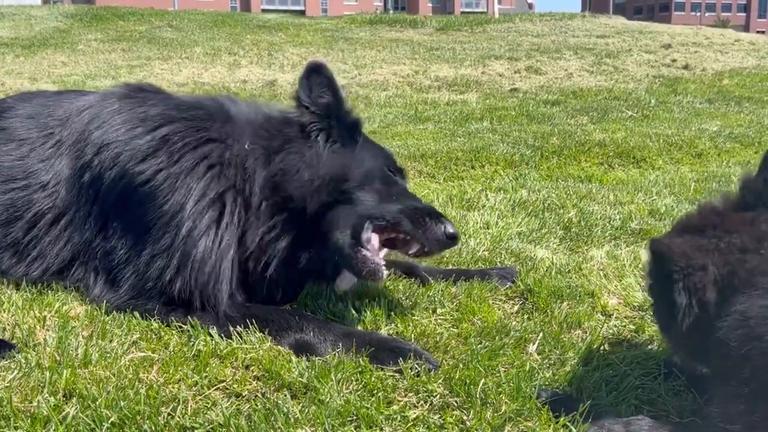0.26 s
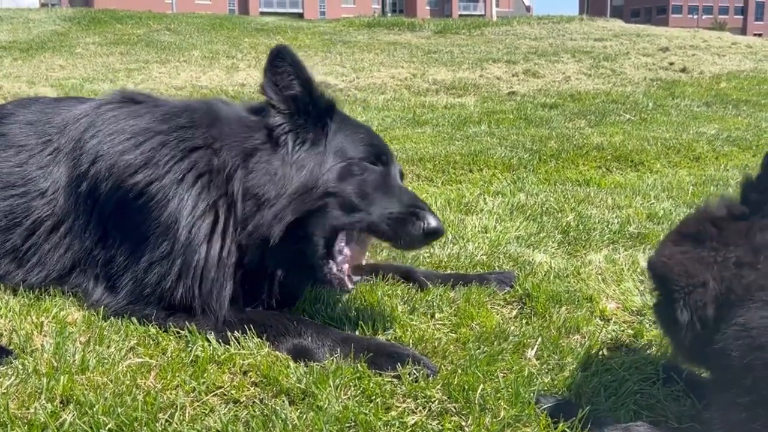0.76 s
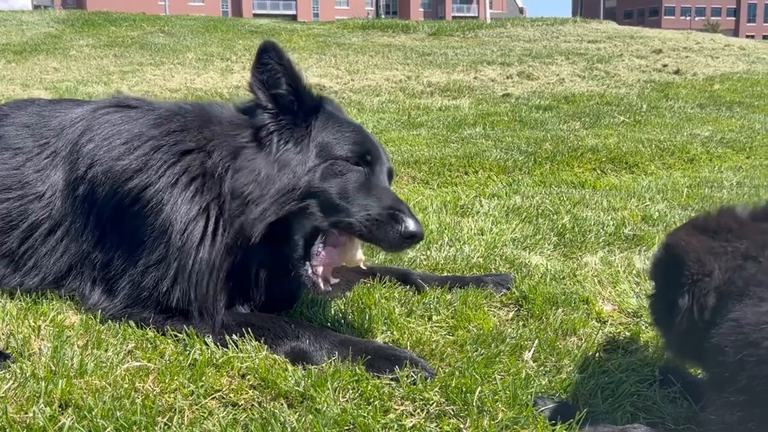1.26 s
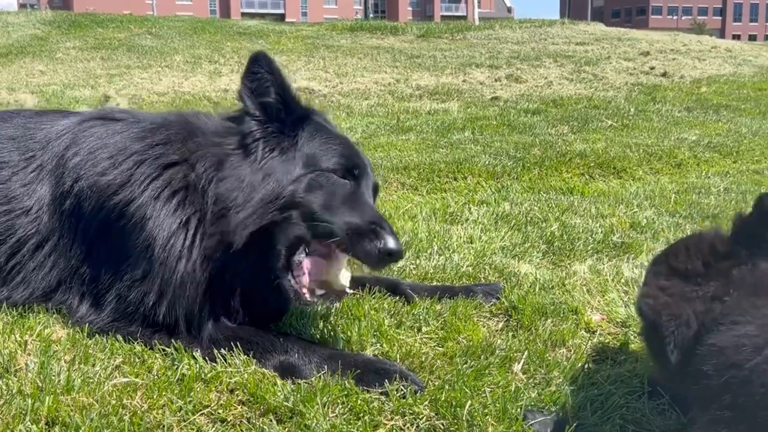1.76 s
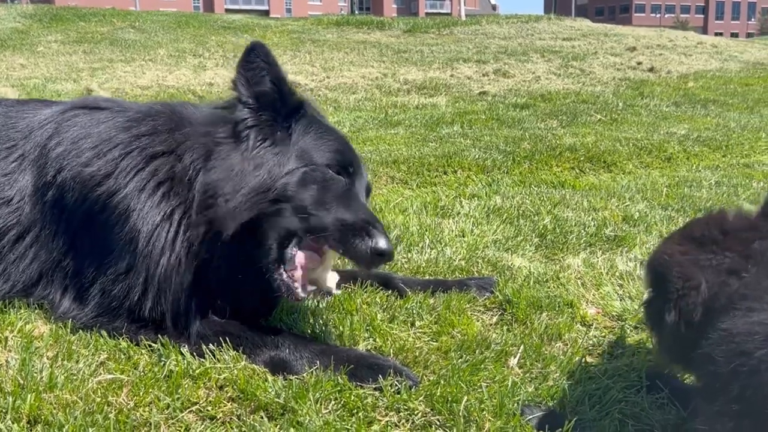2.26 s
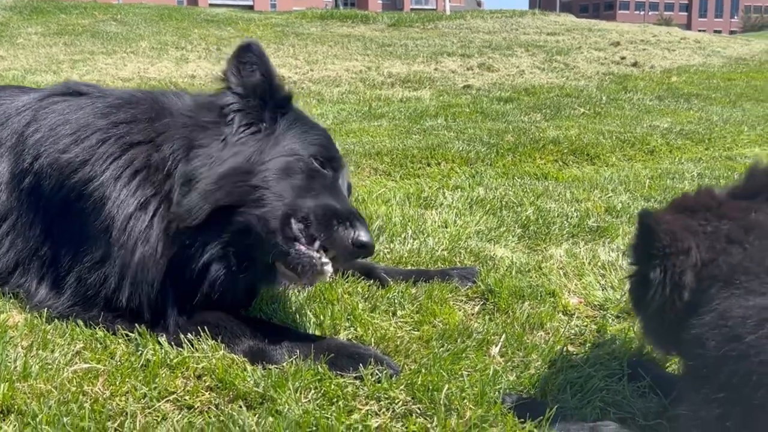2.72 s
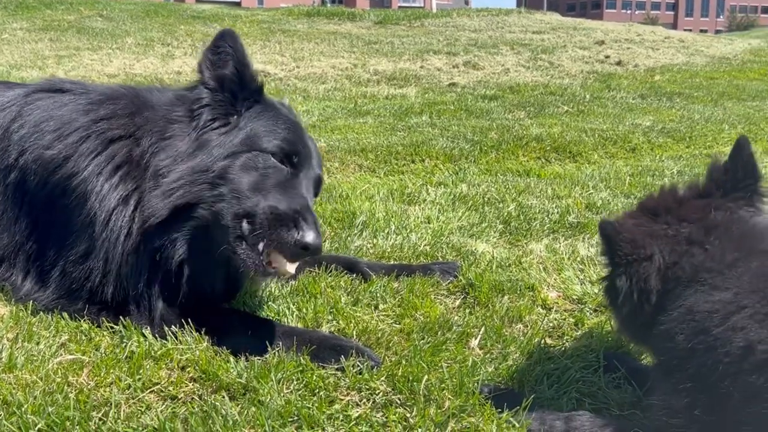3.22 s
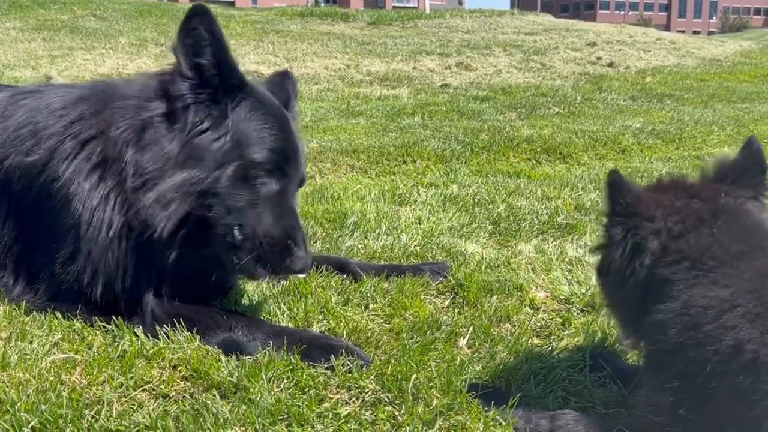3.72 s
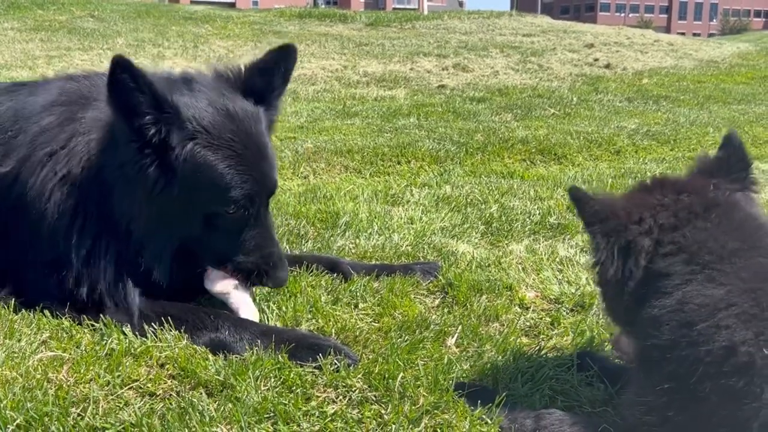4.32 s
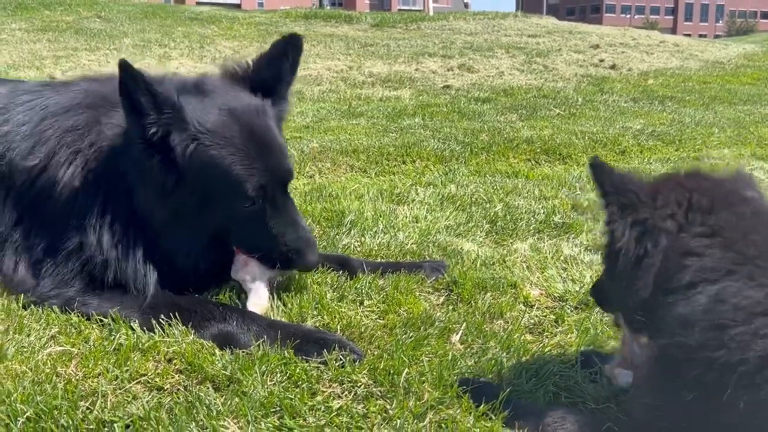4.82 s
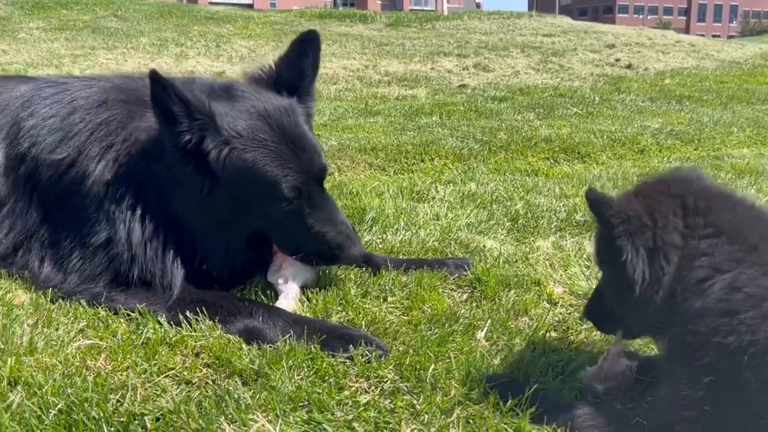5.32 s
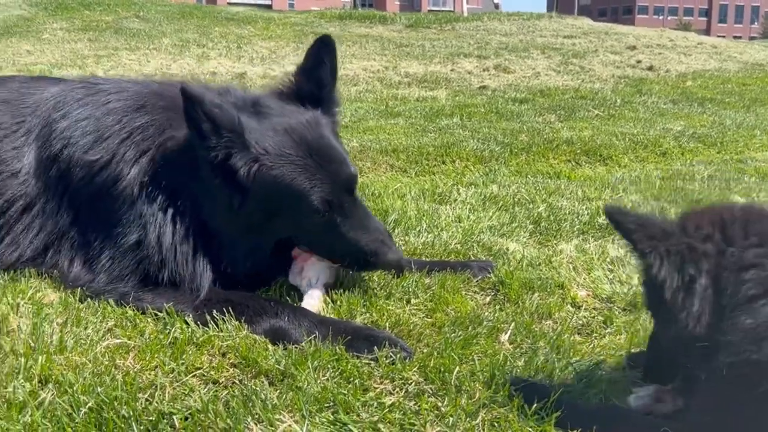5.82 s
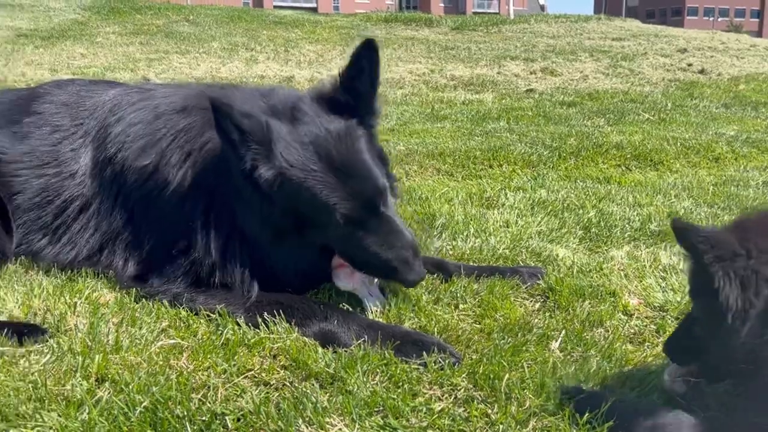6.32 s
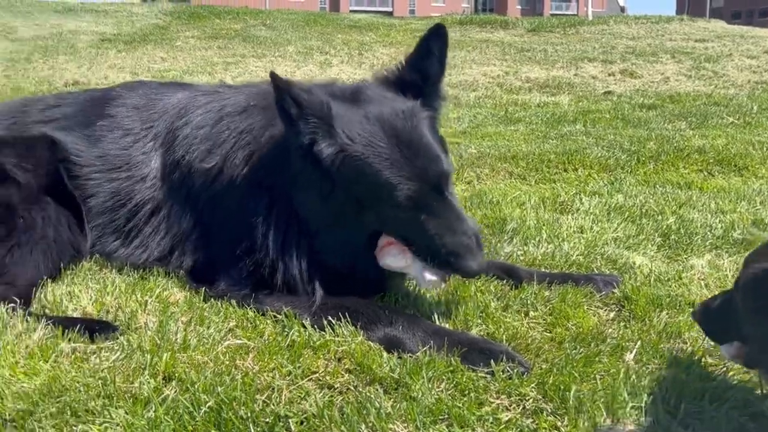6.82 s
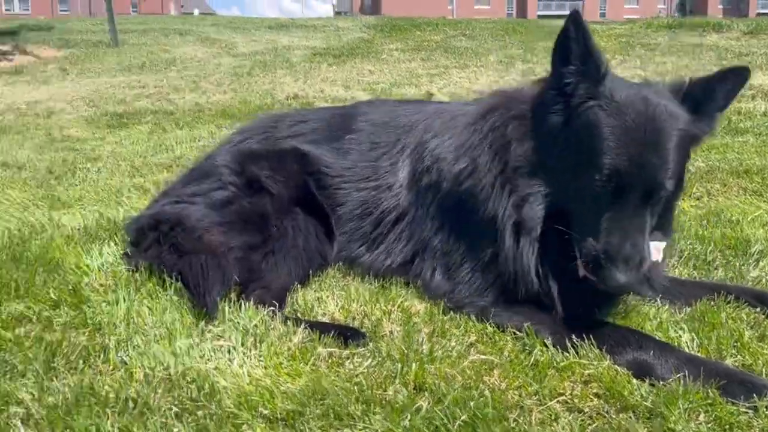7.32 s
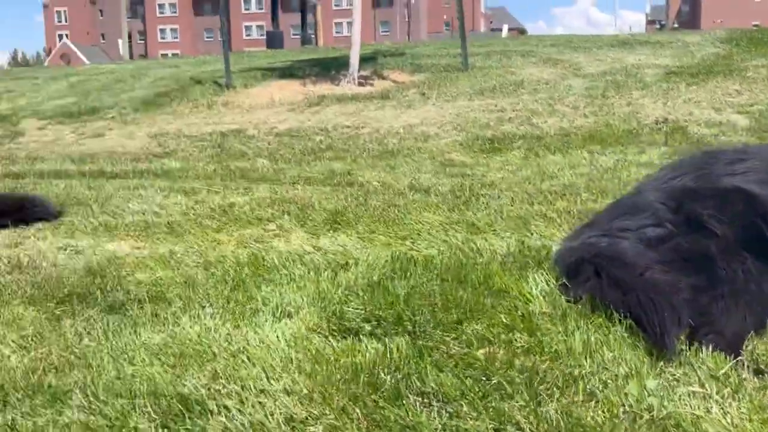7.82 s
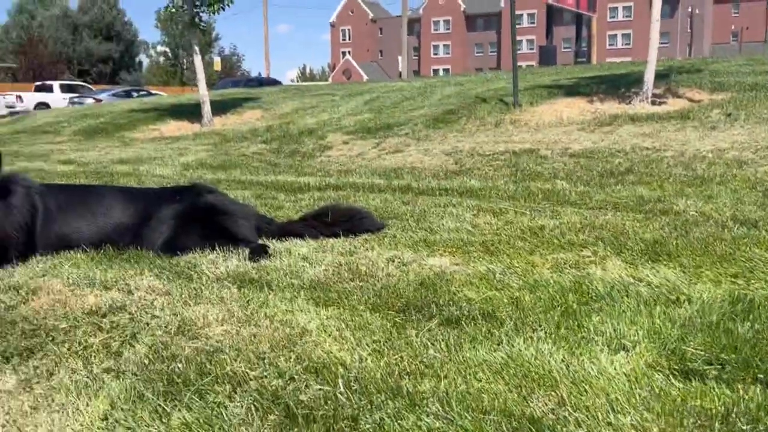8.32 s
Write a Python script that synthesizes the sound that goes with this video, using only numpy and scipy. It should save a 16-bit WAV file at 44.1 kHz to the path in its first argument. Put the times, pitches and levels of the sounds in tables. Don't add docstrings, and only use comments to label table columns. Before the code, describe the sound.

Close, dry bone crunching and gristle crackle from chewing dogs, thickening into a splintering burst near the end, above a soft, low town drone.

```python
import sys
import numpy as np
from scipy import signal
from scipy.fft import rfft, irfft, next_fast_len
from scipy.io import wavfile
from scipy.ndimage import uniform_filter1d

SR = 44100
rng = np.random.default_rng(int(sys.argv[2]) if len(sys.argv) > 2 else 0)


def to_linear_factor(level_db):
    exponent = np.asarray(level_db, float) / 20
    return 10 ** exponent


def materialize(psi):
    bounded = np.clip(np.atleast_2d(psi).T, -1, 1)
    quanta = np.round(bounded * 32767).astype(np.int16)
    wavfile.write(sys.argv[1], SR, quanta)


N = 377937

# f/Hz, level/dB per Hz
TOWN_SPECTRUM = [(15, -40.5), (25, -32.5), (49, 4), (78, -4.5), (568, -22.5), (1030, -28.5), (1680, -36),
                 (2040, -39), (2800, -41.5), (3050, -49.5), (3500, -49.5), (3700, -54), (6210, -59),
                 (8370, -70.5), (10100, -95), (11600, -69.5), (16500, -92)]
# t/s, level/dB, brightness/dB
TOWN_SWELL = [
    (0, -46.5, 3),
    (2.1, -46.5, 3),
    (3, -47.5, 3),
    (4.5, -46.5, 1.5),
    (6.4, -47, 2),
    (7.3, -47.5, 2),
    (7.9, -50.5, -1),
    (8.57, -48.5, 3),
]
# f/Hz, likeness/0-1, right leads/rad
MIC_PAIR = [(59.7, 1, 0), (170, 0.83, 0.18), (320, 0.9, 0.95), (403, 0.65, 1.6), (746, 0.89, 2.5),
            (1070, 0.81, 1.53), (1460, 0, 3), (1850, 1, 4.5), (1980, 0.99, 6), (3500, 0.8, 5.5),
            (7000, 1, 5), (15000, .7, 6.5)]
# f/Hz, left minus right/dB
TOWN_LEAN = [(60, 0), (200, 2.1), (380, 2.5), (700, -2.5), (1300, 2.5), (2400, 0.3), (15000, 1)]
# t/s, level/dB
HUM_SWELL = [(0, -33.5), (.6, -36), (1.4, -33.5), (1.8, -38), (2.2, -31.5), (2.6, -37), (3.4, -37.5),
             (4.2, -33), (4.6, -34), (5, -38), (5.8, -33.5), (6.2, -36.5), (6.6, -37), (7.4, -38),
             (7.8, -37), (8.57, -32)]
HUM_HZ = 59.9
OCTAVE_DB, OCTAVE_GROWTH = -52.5, 1
# t/s, firing rate f/Hz, level/dB, second order level/dB
ENGINE_DRIFT = [(0, 51.65, -40.5, -51), (.8, 49.84, -42, -46.5), (1.4, 47.96, -66, -51),
                (1.8, 51.4, -43, -64), (2.2, 53.7, -46, -48), (2.6, 53.16, -50, -51.5),
                (3.2, 50.7, -57, -52), (3.6, 49.8, -64, -62), (5.2, 45.7, -62.5, -58),
                (5.6, 48, -54, -46.5), (6.1, 54.86, -58, -41), (6.6, 63.9, -35.5, -50),
                (7, 64.84, -75, -51), (7.9, 67.2, -79, -49.5), (8.57, 70.6, -61, -44.5)]
# f/Hz, level/dB, on t/s, off t/s
WHINE_TONES = [
    (589, -1, 1.15, 2.1),
    (815, -1, .6, 1.9),
    (835, 0, 0.7, 2.02),
    (1068, -1, 0.6, 1.1),
    (1327, -8, 0.68, 1.6),
]
WHINE_DB = -60.5
# f/Hz, level/dB, time to fall 60 dB/s
TAG_MODES = [
    (5950, -17, .03),
    (7300, -20, .03),
    (8350, -20, .12),
    (8550, 0, .032),
    (9100, -10, .025),
    (12100, -15, .03),
]
TAG_S, TAG_DB = 3.678, -40
# t/s, peak level/dB, ring f/Hz, time to fall 60 dB/s
JAW_KNOCKS = [(0.417, -40.5, 546, 0.035), (0.611, -37.5, 710, 0.03), (0.859, -40, 1320, 0.027),
              (3.609, -42, 603, 0.041), (4.128, -39, 604, 0.046), (4.168, -42, 900, 0.051),
              (4.1755, -33, 897, 0.048), (4.183, -32, 880, 0.031), (4.594, -33.5, 510, 0.026),
              (7.199, -27, 610, 0.012), (7.961, -31, 897, 0.014), (8.041, -31, 904, 0.013),
              (8.144, -57, 499, 0.037), (8.457, -44, 810, 0.033)]
# t/s, strike level/dB, mode f/Hz
JAW_BONE_RINGS = [(.5163, -36, 2800), (.5205, -26, 2300), (.5355, -33, 2500), (.547, -37, 2300),
                  (2.219, -37, 2300), (5.9675, -29, 3770), (5.968, -14.5, 2300), (5.9688, -18.5, 1480),
                  (6.986, -31, 4580), (6.9863, -21, 2330), (6.9868, -20.5, 3230), (7.1977, -12, 2580),
                  (7.1979, -14.5, 3430), (7.7115, -31, 3750), (8.0105, -42, 6500)]
BONE_T60_S, BONE_RISE_S = .0062, .0012
# t/s, length/s,
# level/dB, centre f/Hz, width/Hz
FLESH_RIPS = [(.84, .16, -67, 4100, 2010), (1.807, .055, -60, 3800, 2800), (3.295, .075, -61, 2900, 1800),
              (3.59, .06, -55.5, 1520, 1300), (7.992, .065, -65, 3500, 5000), (8.4, .075, -58, 2600, 3500),
              (8.49, .08, -60, 2800, 4000), (7.9775, .003, -49, 12500, 7000), (7.64, .04, -61, 6000, 9000),
              (.556, .012, -57.5, 12000, 3000), (6.9855, .003, -46, 12500, 6000),
              (7.9507, .003, -45, 11500, 5000), (7.9255, .003, -46, 12500, 7000),
              (8.546, .008, -58, 12000, 4000), (4.0, .05, -70, 7500, 3000), (4.87, .045, -70, 7000, 5000),
              (7.1965, .003, -47, 12100, 2500), (2.9, .03, -67, 4500, 4000),
              (1.799, .009, -60, 12500, 6000), (1.812, .045, -70, 13500, 6000),
              (8.553, .016, -62, 6000, 7000), (8.522, .012, -62, 7000, 5000),
              (8.428, .012, -53, 4500, 5000), (8.452, .02, -53, 1600, 1400), (5.972, .05, -68, 7000, 9000)]
# f/Hz, level/dB per Hz
GRISTLE_SPECTRUM = [(590, -29), (1000, 1), (1190, -11), (1340, -12), (2680, -10.5), (3050, -12),
                    (4280, -14), (13700, -34), (15200, -41.5), (16500, -52)]
# f/Hz, level/dB per Hz
SPLINTER_SPECTRUM = [(590, -46), (1000, -5), (2500, -7.5), (3680, -4.5), (5610, -10), (8460, -7),
                     (10200, -19.5), (11200, -9), (13800, -25.5), (15400, -14), (16500, -40)]
# t/s, effort level/dB
JAW_BITES = [(.38, -67), (.92, -76), (1.42, -67.5), (1.92, -79), (2.35, -71), (2.8, -66), (3.27, -68.5),
             (3.6, -78), (4.14, -69.5), (4.68, -69), (5.02, -69.5), (5.94, -65.5), (6.52, -67.5),
             (7.0, -71), (7.7, -66.5), (7.99, -66), (8.46, -65)]
SQUEEZE_DB_PER_S, RELEASE_DB_PER_S, REST_DB = 31.5, 38, -74.5
CHIPS_PER_S, CHIPS_DB, CHIP_SPREAD_DB = 70, -14, 3.5
# t/s, level/dB, f/Hz
DULL_GNAWS = [(0.0075, -50, 2180), (0.232, -53, 2370), (0.2474, -54, 1850), (0.6815, -51.5, 2020),
              (0.8561, -56, 2710), (0.9189, -57, 2330), (0.9394, -52, 2300), (1.1758, -59, 1940),
              (1.2576, -54, 2122), (1.5385, -53.5, 2370), (1.6587, -53, 1850), (1.7385, -58.5, 2694),
              (1.8623, -54.5, 2230), (1.9082, -51, 2207), (1.962, -63, 2070), (2.3856, -54, 2350),
              (2.5382, -51, 1810), (2.7707, -58, 2256), (2.9139, -55.0, 2697), (2.9303, -54, 2660),
              (3.0221, -57, 2140), (3.09, -50, 2280), (3.2017, -55, 1980), (3.2127, -53, 2250),
              (3.4102, -55, 2033), (3.964, -58, 1940), (4.0383, -58, 2110), (4.3785, -55, 2055),
              (4.7861, -62, 2500), (5.5085, -57, 1980), (5.9121, -56, 2240), (6.2378, -61, 2595),
              (6.3865, -61, 2802), (6.4678, -57.0, 2112), (6.8863, -53, 1939), (7.1303, -62, 2670),
              (7.3518, -60, 2285), (7.6611, -55, 2110), (7.7279, -56, 1660), (7.7923, -56, 1682),
              (7.8671, -63, 2070), (8.0203, -59, 2760), (8.1714, -58, 2240), (8.2278, -54, 1810),
              (8.4358, -45, 2410)]
# t/s, level/dB, f/Hz
DRY_NIBBLES = [(0.2479, -57.0, 5730), (0.3457, -67, 5170), (0.4171, -47, 3450), (0.8705, -58, 3570),
               (0.8765, -60.0, 3490), (0.9094, -59, 4220), (0.9972, -60, 4570), (1.2616, -57, 4050),
               (1.3898, -48.5, 3790), (1.4068, -55, 4130), (1.4537, -52.5, 3490), (1.53, -63, 7670),
               (1.6423, -60, 7060), (1.8987, -60, 5730), (1.9082, -47.5, 3750), (1.9251, -63, 5040),
               (1.962, -61, 3490), (2.0803, -64, 3620), (2.1356, -56, 3360), (2.2, -59, 3750),
               (2.639, -62, 7410), (2.7233, -58, 3400), (2.8495, -59, 9000), (3.2591, -61, 3530),
               (3.283, -53, 3920), (3.32, -56, 3750), (3.3708, -60.0, 4260), (3.4033, -59, 4310),
               (3.4127, -62, 3490), (3.5859, -57, 3700), (3.6737, -60, 3620), (3.7864, -66.5, 5120),
               (3.8453, -59, 3230), (3.9635, -69, 3570), (5.5284, -64, 3360), (5.9061, -63, 4130),
               (5.9914, -58, 5120), (6.0847, -58.0, 4570), (6.171, -61.0, 4220), (6.2348, -63, 3570),
               (6.4613, -62, 4610), (6.6264, -60, 3620), (6.8868, -58, 4050), (6.9088, -60, 5810),
               (6.9422, -60, 4390), (7.267, -63, 5210), (7.278, -63, 8310), (7.5, -60, 3790),
               (7.5688, -66, 3320), (7.5992, -56, 3360), (7.6736, -58, 3530), (7.7953, -62, 3530),
               (7.9459, -58, 4260), (8.0682, -61.0, 4310), (8.1455, -53, 3450), (8.1834, -62, 7110),
               (8.2258, -59, 3230), (8.2966, -64, 6760), (8.3206, -59, 6980), (8.5156, -55, 3960)]
# t/s, level/dB, f/Hz
WET_GLINTS = [(0.5352, -57, 11700), (0.616, -56, 8050), (0.8579, -58, 8100), (1.0296, -61, 7340),
              (1.1747, -59, 6800), (1.3424, -61, 7870), (1.7235, -60, 7630), (1.9624, -61, 6750),
              (2.3134, -68, 7260), (2.407, -54, 7430), (2.4944, -59, 7136), (2.7292, -70, 6708),
              (6.3275, -61, 8010), (6.449, -58, 6750), (6.482, -63, 6797), (6.6318, -63, 7830),
              (6.6732, -61, 7580), (6.8934, -58, 7310), (6.9114, -62, 6585), (7.3497, -70, 6840),
              (7.4086, -60, 6660), (8.1319, -57, 8280), (8.2701, -61, 6640), (8.3659, -59, 6870),
              (8.5654, -49, 7410)]
GNAW_MS, GNAW_WIDTH, GNAW_DRY_DB = 3.76, 0.37, -27
NIBBLE_MS, NIBBLE_WIDTH, NIBBLE_DRY_DB = 2.6, 0.52, -13
GLINT_MS, GLINT_WIDTH, GLINT_DRY_DB = 2.7, 0.59, -9
# t/s, ring level/dB, ring f/Hz, splinters level/dB, length/ms
BONE_BREAKS = [(0.2425, -55, 1800, -49.5, 2.2), (0.277, -42, 2520, -63, 3.4),
               (0.416, -45.5, 2240, -55.5, 4.7), (0.521, -60, 4900, -64, 2),
               (0.5617, -50.5, 4400, -65, 3.6), (1.099, -33.5, 2430, -51.5, 3.4),
               (1.3627, -50, 3960, -51.5, 4), (1.4958, -39, 4440, -63, 3.25),
               (1.804, -43.5, 5070, -47, 3.7), (1.9038, -46, 1750, -56, 1.9), (2.0138, -48, 2170, -57, 7.4),
               (2.025, -43, 4030, -61, 2.8), (2.225, -41, 2120, -64, 5), (2.301, -49.5, 4080, -62, 9),
               (2.89, -39, 4168, -60, 1.7), (2.8998, -40, 3930, -60, 2.6), (3.293, -36, 2260, -52, 2.9),
               (4.058, -49, 1520, -59, 3), (4.178, -42.5, 2830, -54, 2.1), (4.184, -46, 2040, -45, 4.5),
               (5.508, -60, 2073, -51.5, 3.16), (5.9682, -45, 5806, -50, 1.93),
               (6.9871, -45, 6200, -40, 2.54), (7.1983, -48, 4300, -35.5, 2.9)]
# t/s, ring level/dB, ring f/Hz, splinters level/dB, length/ms
BIG_BONE_SHATTER = [(7.651, -50, 1870, -63, 5.9), (7.657, -62, 3640, -53, 2.5),
                    (7.927, -46, 4850, -46, 1.6), (7.9332, -67, 2900, -53, 2.7),
                    (7.9518, -63, 4840, -47, 3.2), (7.961, -52, 2240, -32.5, 2.5),
                    (7.979, -41, 2200, -35.5, 2.7), (8.0009, -59, 2844, -52, 1.8),
                    (8.0192, -53, 2700, -44.5, 2), (8.031, -57, 3190, -55, 1.9),
                    (8.0443, -46, 1860, -55, 2.2), (8.051, -30, 1367, -54, 2.9),
                    (8.146, -37, 1340, -67, 3.5), (8.3967, -36, 2620, -38, 2.9),
                    (8.4038, -50, 3300, -51, 3.3), (8.4146, -35, 3540, -37.5, 3.6),
                    (8.426, -34, 2390, -37, 1.9), (8.432, -62, 3630, -46, 7.7),
                    (8.4348, -31, 3630, -42, 0.93), (8.459, -53, 3640, -44, 4.3),
                    (8.4656, -41.5, 1730, -45, 5), (8.498, -47, 3200, -59, 5),
                    (8.5382, -49, 2427, -43, 2.9), (8.549, -53, 2520, -47.5, 4.4)]
# t/s, ring level/dB, ring f/Hz
CARTILAGE_POPS = [(0.5278, -42, 2400), (.8326, -47, 2610), (0.903, -51, 2220), (1.017, -49, 2240),
                  (.539, -53, 2430), (1.0876, -42, 2180), (1.237, -51, 2330), (0.5628, -36, 2480),
                  (1.3906, -51, 2570), (1.4057, -49, 2070), (1.452, -50, 2620), (1.5303, -54, 1730),
                  (2.4445, -47, 2370), (2.6625, -41, 2070), (2.7814, -45, 2140), (3.281, -47, 1960),
                  (3.32, -51, 1980), (5.1027, -48.5, 3070), (5.892, -40.5, 2300), (6.0008, -41, 2270),
                  (6.066, -37, 1980), (6.077, -44, 1953), (6.4477, -41, 2160), (6.461, -55, 2028),
                  (6.552, -44, 2040), (6.733, -44.5, 1950), (6.895, -42, 1974), (7.4335, -49.5, 2570),
                  (1.495, -38, 2310), (8.2766, -48, 2140)]
# t/s, ring level/dB, ring f/Hz
CHIP_TICKS = [(.3356, -61, 7040), (0.392, -55, 3830), (0.8086, -61, 6000), (1.048, -55, 4570),
              (0.744, -53, 2520), (0.92, -53.5, 4260), (0.963, -57, 4250), (1.649, -62, 6750),
              (1.971, -50, 3420), (2.4067, -58, 3500), (3.595, -59, 5070), (3.993, -60, 7640),
              (4.168, -52, 2727), (5.378, -58.5, 3100), (5.9188, -55, 4170), (6.5388, -52.5, 3060),
              (6.5669, -55, 3200), (7.713, -63, 4960), (7.742, -52.5, 3590), (8.328, -54, 3580)]
POP_MS, POP_SPLINTER_DB, POP_OVERTONE_DB = 3.4, -29, -2.5
TICK_MS, TICK_SPLINTER_DB = 7.2, -18
WOBBLE, POP_GRIT = 3.5, .3
CRUMBLE_DB, CRUMBLE_S, CRUMBS_PER_S = -12, .0035, 600
LAG_SAMPLES = 0.82


def evened(x):
    return x / np.sqrt(np.mean(x ** 2) + 1e-20)


def smooth_twice(x, span):
    return uniform_filter1d(uniform_filter1d(x, span), span)


def wander(count, span):
    return evened(smooth_twice(rng.standard_normal(count), span))


def read(points, hz):
    f, value = np.transpose(points)
    return np.interp(np.log(hz + 1), np.log(f + 1), value)


def follow(rows, t):
    s, *columns = np.transpose(rows)
    return [np.interp(t, s, column) for column in columns]


def add(mix, s, sound):
    part = mix[round(s * SR):][:len(sound)]
    part += sound[:len(part)]


def colour(x, points):
    hz = np.abs(np.fft.fftfreq(2048, 1 / SR))
    log_gain = np.log(to_linear_factor(np.maximum(read(points, hz), -70)))
    taps = np.fft.ifft(np.exp(np.conj(signal.hilbert(log_gain)))).real[:512]
    return signal.oaconvolve(x, taps / np.linalg.norm(taps))[:len(x)]


def resonate(x, hz, width_hz):
    resonance = signal.iirpeak(hz, hz / width_hz, SR)
    return signal.lfilter(*resonance, signal.lfilter(*resonance, x))


def ring(hz, db, t60, rise=.0005):
    t = np.arange(round(t60 * SR) + 8) / SR
    return to_linear_factor(db - 60 * t / t60) * (1 - np.exp(-t / rise)) * np.sin(2 * np.pi * hz * t)


def town(patchy_db=1.5):
    frames, hz = N // 512 + 5, np.fft.rfftfreq(2048, 1 / SR)
    a, b, c, d, patches = rng.standard_normal((frames, 1025, 5)).T
    patches = uniform_filter1d(patches, size=16, axis=0)
    patches = evened(uniform_filter1d(patches, size=8, axis=1))
    level_db, bright_db = follow(TOWN_SWELL, np.arange(frames) * 512 / SR)
    shape = read(TOWN_SPECTRUM, hz)
    body = (hz > 200) & (hz < 1500)
    shape = shape - 10 * np.log10(np.sum(to_linear_factor(shape[body]) ** 2))
    tilt = np.clip(np.log2((hz + 1) / 1200), 0, 1.5)[:, None] * bright_db
    usual_db = level_db.mean()
    swell = np.clip(np.log2((hz + 1) / 100), 0, 1)[:, None] * (level_db - usual_db)
    same, lead = (column[:, None] for column in follow(MIC_PAIR, hz))
    same = np.clip(same, 0, 1)
    lean = to_linear_factor(read(TOWN_LEAN, hz) / 2)[:, None]
    left = a + 1j * b
    right = same * np.exp(1j * lead) * left + np.sqrt(1 - same ** 2) * (c + 1j * d)
    gain = to_linear_factor(shape[:, None] + usual_db + swell + tilt + patchy_db * patches)
    z = np.array([left * lean, right / lean]) * gain
    return to_linear_factor(2.5) * signal.istft(z, nperseg=2048, noverlap=1536)[1][:, :N]


def plant_hum():
    t = np.arange(N) / SR
    db = follow(HUM_SWELL, t)[0]
    octave_db = OCTAVE_DB + OCTAVE_GROWTH * (db + 37)
    low = to_linear_factor(db + 3) * np.sin(2 * np.pi * HUM_HZ * t)
    return low + to_linear_factor(octave_db + 3.5) * np.sin(4 * np.pi * (HUM_HZ + 0.312) * t)


def engine():
    hz, db, second_db = follow(ENGINE_DRIFT, np.arange(N) / SR)
    turn = 2 * np.pi * np.cumsum(hz) / SR
    return to_linear_factor(db + 5.5) * np.sin(turn) + to_linear_factor(second_db + 3) * np.sin(2 * turn)


def whine():
    t, out = np.arange(N) / SR, np.zeros(N)
    for hz, db, on, off in WHINE_TONES:
        start = np.clip((t - on) / .04, 0, 1)
        fade_db = -np.clip((t - off) * 40, 0, 4) - np.maximum(t - off, 0) * 6
        out += to_linear_factor(db) * start * to_linear_factor(fade_db) * np.sin(2 * np.pi * hz * t)
    return to_linear_factor(WHINE_DB + 0.43 * wander(N, 4000)) * out


def lawn(x, tail_t60=.012, tail_db=-15):
    t = np.arange(2000) / SR
    taps = rng.standard_normal((2, 2000)) * (rng.random((2, 2000)) < .05)
    taps = taps * to_linear_factor(-60 * t / tail_t60) * (t > .001)
    taps = taps / np.linalg.norm(taps, axis=1)[:, None]
    return x + to_linear_factor(tail_db) * signal.oaconvolve(x[None], taps, axes=1)[:, :N]


def collar_tag():
    out = np.zeros(N)
    for hz, mode_db, t60 in TAG_MODES:
        add(out, TAG_S, ring(hz, TAG_DB + mode_db, t60, rise=0.0017))
    return out


def knocks():
    out = np.zeros(N)
    for s, db, hz, t60 in JAW_KNOCKS:
        add(out, s, ring(hz, db + 1, t60, rise=0.0012))
    for s, db, hz in JAW_BONE_RINGS:
        add(out, s, ring(hz, db, BONE_T60_S, BONE_RISE_S))
    return out


def tears():
    out = np.zeros(N)
    for s, length, db, hz, width in FLESH_RIPS:
        grains = rng.standard_normal(12000) * np.exp(0.33 * wander(12000, 60))
        puff = resonate(grains[:round(length * SR)], hz, width)
        add(out, s, to_linear_factor(db) * evened(puff) * signal.windows.tukey(len(puff), .6))
    return out


def nibbles(rows, ms, width, dry_db):
    tuned, dry = np.zeros(N), np.zeros(N)
    swell = np.hanning(round(ms * SR / 1000))
    noise = rng.standard_normal((len(rows), 2, 600))
    for (s, db, hz), (a, b) in zip(rows, noise):
        band = resonate(a, hz, width * hz)[300:][:len(swell)]
        start = s - ms / 2000
        add(tuned, start, to_linear_factor(db) * evened(swell * band))
        add(dry, start, to_linear_factor(db + dry_db) * evened(swell * b[:len(swell)]))
    return tuned + colour(dry, SPLINTER_SPECTRUM)


def effort_db(t):
    s, db = np.transpose(JAW_BITES)[:, :, None]
    slope = np.where(t < s, SQUEEZE_DB_PER_S, RELEASE_DB_PER_S)
    return np.maximum((db - slope * abs(t - s)).max(axis=0), REST_DB)


def chips():
    effort = to_linear_factor(effort_db(np.arange(N) / SR))
    size = to_linear_factor(CHIP_SPREAD_DB * np.minimum(rng.exponential(1, N), 2.5))
    size = size * (rng.random(N) < CHIPS_PER_S / SR)
    kind, out = rng.integers(0, 16, N), np.zeros(N)
    for k, hz in enumerate(np.geomspace(1700, 15300, 16)):
        t60 = 0.0017 + 7 / hz
        snap = ring(hz, 2.5, t60, rise=0.00048) + ring(1.45 * hz, -4, t60, rise=0.00048)
        snap = snap / np.linalg.norm(snap)
        level = to_linear_factor(read(GRISTLE_SPECTRUM, hz)) * hz ** 0.77
        out += level * signal.oaconvolve(size * (kind == k), snap)[:N]
    return to_linear_factor(CHIPS_DB) * effort * evened(out)


def gristle():
    effort = to_linear_factor(effort_db(np.arange(N) / SR))
    clump_db = 2.6 * np.clip(wander(N, 80), -2.5, 2.5)
    size = to_linear_factor(clump_db + 3 * np.minimum(rng.exponential(1, N), 3.5))
    size = size * (rng.random(N) < 3000 / SR)
    kind, out = rng.integers(0, 24, N), np.zeros(N)
    for k, hz in enumerate(np.geomspace(1800, 13000, 24)):
        snap = ring(hz, 0, 0.0038 + 12 / hz, rise=0.0011)
        snap = snap / np.linalg.norm(snap)
        level = to_linear_factor(read(GRISTLE_SPECTRUM, hz)) * np.sqrt(hz)
        out += level * signal.oaconvolve(size * (kind == k), snap)[:N]
    return to_linear_factor(1.0) * effort * evened(out)


def all_cracks():
    breaks = [(*row, 0) for row in BONE_BREAKS + BIG_BONE_SHATTER]
    pops = [(s, db, hz, db + POP_SPLINTER_DB, POP_MS, POP_OVERTONE_DB) for s, db, hz in CARTILAGE_POPS]
    ticks = [(s, db, hz, db + TICK_SPLINTER_DB, TICK_MS, 0) for s, db, hz in CHIP_TICKS]
    return breaks + pops + ticks


def cracks():
    bone, splinters = np.zeros(N), np.zeros(N)
    t, after = np.arange(700) / SR, np.arange(2000) / SR
    rows = all_cracks()
    chance = rng.standard_normal((len(rows), 1402))
    crumbs = rng.random((len(rows), 2, 2000))
    for (s, ring_db, hz, splinter_db, ms, over_db), luck, (when, size) in zip(rows, chance, crumbs):
        pace = .00022 * ms
        grit = POP_GRIT if over_db else 1
        noise = luck[2:702]
        hump = (t / pace) ** 1.83 * np.exp(1.5 - t / pace) / 1.664 ** 2
        ratios = [[1], [1.4 + 0.048 * luck[0]], [0.835 + 0.038 * luck[1]], [1.8 + 0.031 * luck[1]]]
        pitches = hz * np.array(ratios)
        levels = to_linear_factor(np.array([3, -6.5 + over_db, -2.5, -15 + over_db]))
        unsteady = grit * WOBBLE * smooth_twice(noise, 20)
        tones = levels @ np.sin(2 * np.pi * pitches * t + unsteady)
        ragged = 1 + grit * 1.4 * smooth_twice(luck[702:], 8)
        early = (t / pace) ** 1.48 * np.exp(-1.6 * t / pace)
        train = to_linear_factor(CRUMBLE_DB) * (when < CRUMBS_PER_S / SR) * (2 * size - 1)
        train = train * np.exp(-after / CRUMBLE_S) * (after > .002)
        train[0] = 1
        add(bone, s - 1.8 * pace, np.convolve(train, to_linear_factor(ring_db) * hump * ragged * tones))
        hiss = to_linear_factor(splinter_db + 17.5) * early * noise
        add(splinters, s - 1.6 * pace, np.convolve(train * abs(train) ** .5, hiss))
    return bone + colour(splinters, SPLINTER_SPECTRUM)


def scene():
    mouth = lawn(cracks() + knocks() + gristle() + tears() + chips() + collar_tag())
    far = plant_hum() + engine() + whine() + town()
    small = nibbles(DULL_GNAWS, GNAW_MS, GNAW_WIDTH, GNAW_DRY_DB)
    small = small + nibbles(DRY_NIBBLES, NIBBLE_MS, NIBBLE_WIDTH, NIBBLE_DRY_DB)
    small = small + to_linear_factor(-7.0) * nibbles(WET_GLINTS, GLINT_MS, GLINT_WIDTH, GLINT_DRY_DB)
    side = to_linear_factor(np.array([[.15], [-.15]]))
    return (mouth + lawn(small)) * side + far


def roll_off(x):
    return signal.sosfilt(signal.butter(12, 17130, fs=SR, output="sos"), x)


def record(dry):
    size = next_fast_len(N + 64)
    delay = np.exp(-2j * np.pi * np.fft.rfftfreq(size) * LAG_SAMPLES)
    x = np.array([dry[0], irfft(rfft(dry[1], size) * delay, size)[:N]])
    x = signal.sosfilt(signal.butter(4, 36, "high", fs=SR, output="sos"), x)
    port = signal.butter(2, (9700, 10900), "bandstop", fs=SR, output="sos")
    x = 0.22 * x + 0.73 * signal.sosfilt(port, x)
    upper_port = signal.butter(2, (13200, 14300), "bandstop", fs=SR, output="sos")
    x = .45 * x + .55 * signal.sosfilt(upper_port, x)
    x = signal.sosfilt(signal.butter(10, 16100, fs=SR, output="sos"), x)
    x = x * np.minimum((N - np.arange(N)) / 300, 1)
    return roll_off(x)


dry = scene()
out = record(dry)
materialize(out)
```